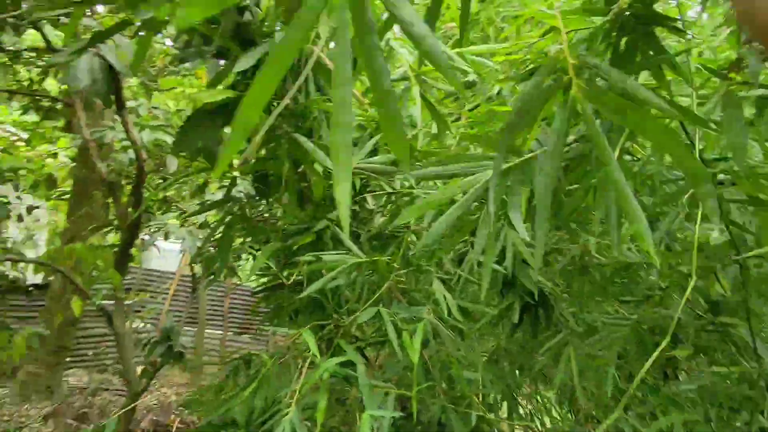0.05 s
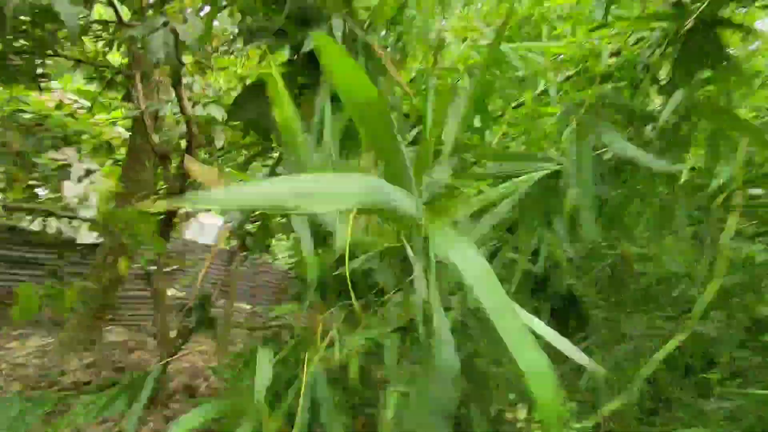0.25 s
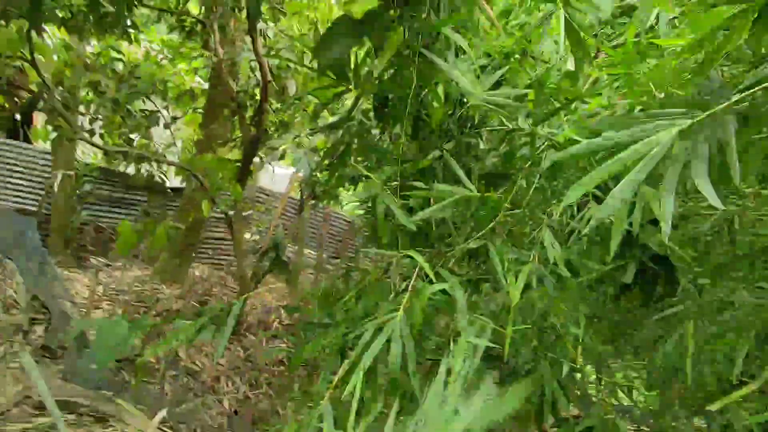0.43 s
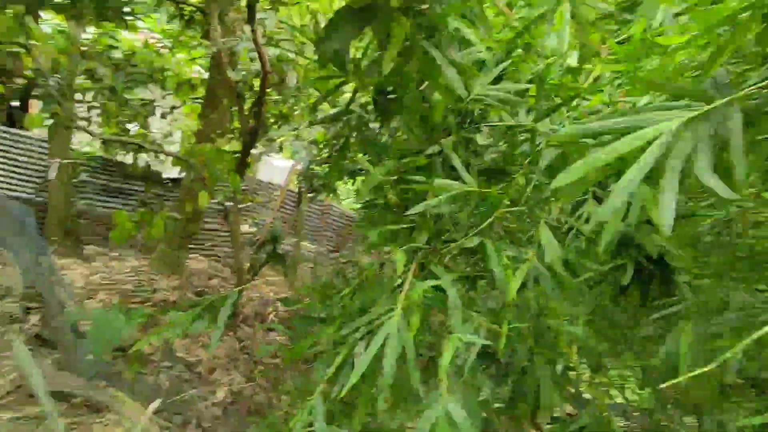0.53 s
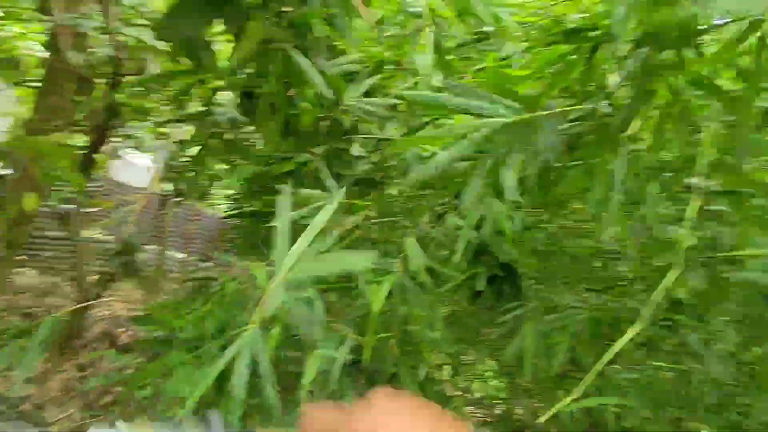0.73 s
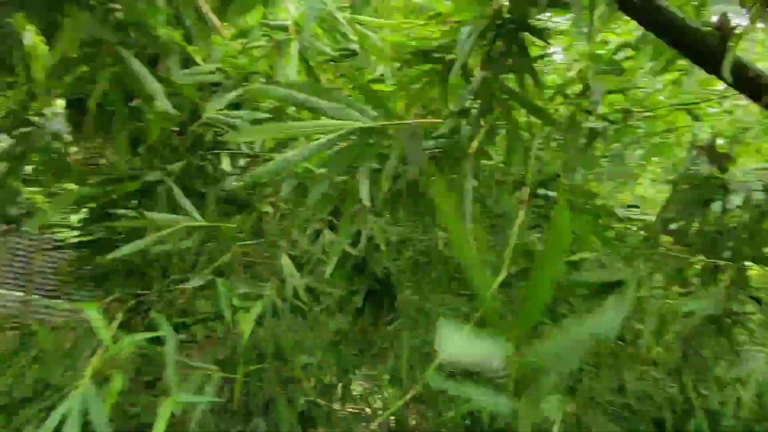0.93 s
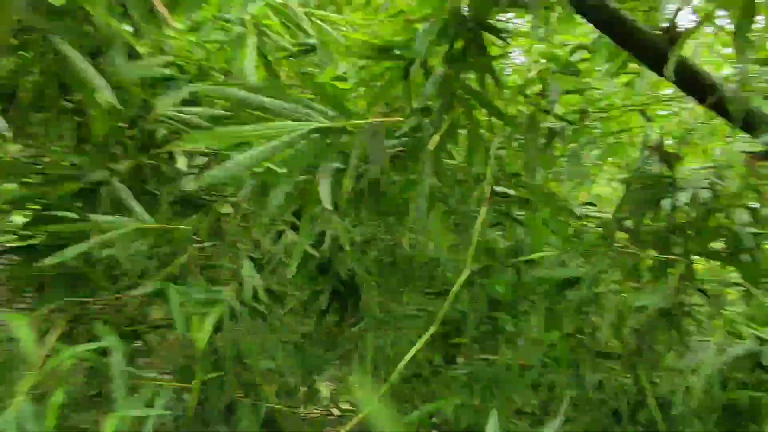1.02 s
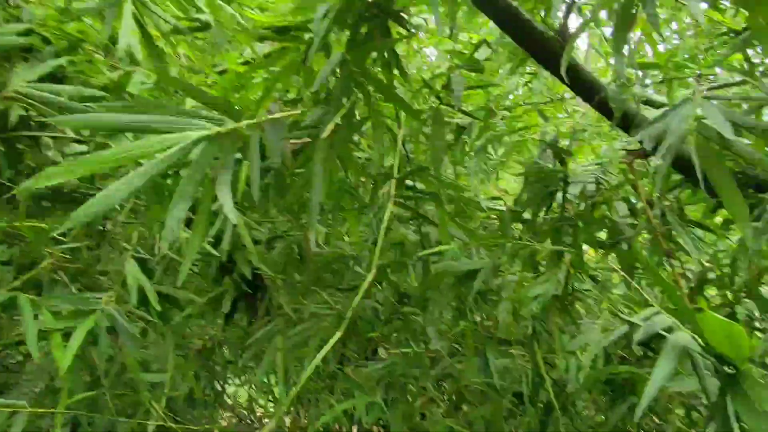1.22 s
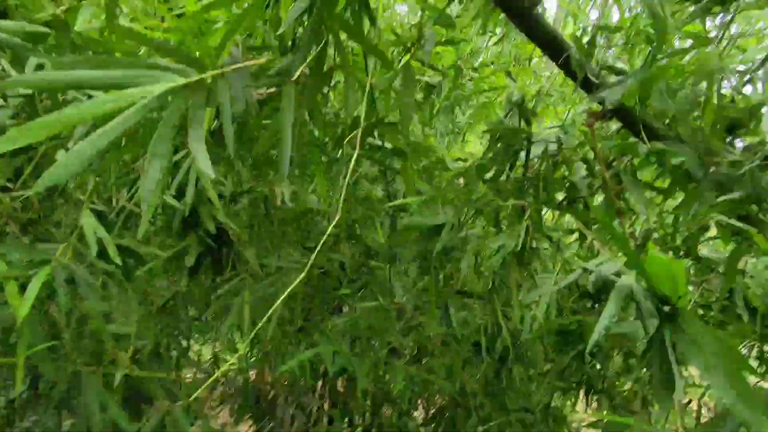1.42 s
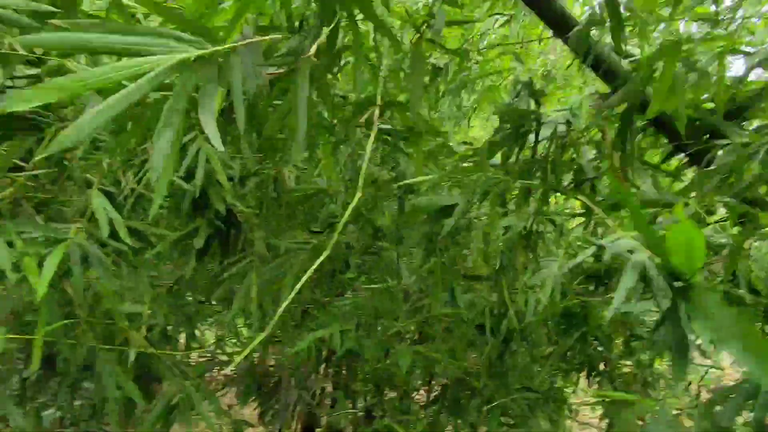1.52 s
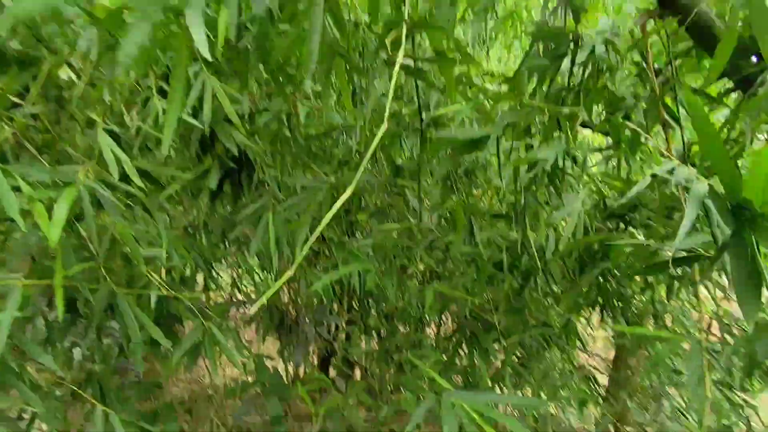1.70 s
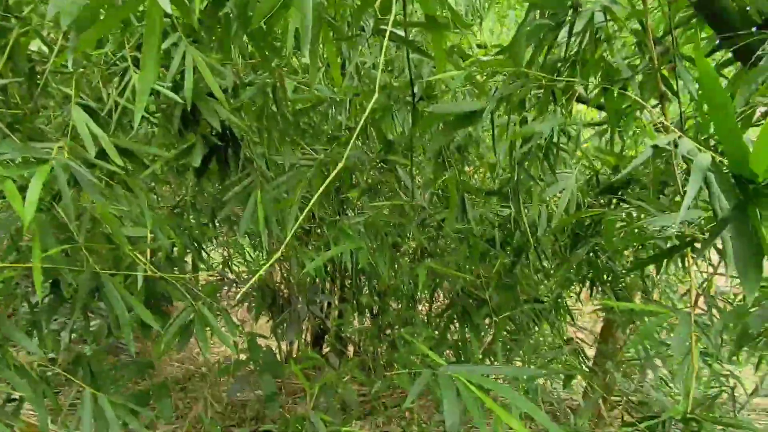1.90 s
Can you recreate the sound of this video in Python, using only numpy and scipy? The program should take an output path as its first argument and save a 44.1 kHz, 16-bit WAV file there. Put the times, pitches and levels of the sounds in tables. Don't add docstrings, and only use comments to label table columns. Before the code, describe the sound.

Two hard machete chops through dry rustling foliage, with stem knocks and a faint distant engine

```python
import sys
import numpy as np
from scipy import signal
from scipy.fft import rfft, irfft, next_fast_len
from scipy.io import wavfile
from scipy.ndimage import uniform_filter1d

SR = 44100
rng = np.random.default_rng(int(sys.argv[2]) if len(sys.argv) > 2 else 0)


def volts_from_db(level):
    exponent = np.asarray(level, float) / 20
    return 10 ** exponent


def transcribe(u):
    v = np.clip(np.atleast_2d(u).T, -1, 1)
    q = np.round(v * 32767).astype(np.int16)
    wavfile.write(sys.argv[1], SR, q)


N = 85995


def in_time(rows):
    s, *columns = np.transpose(rows)
    return [np.interp(np.arange(N) / SR, s, column) for column in columns]


def rms_one(x):
    return x / np.sqrt(np.mean(x ** 2) + 1e-20)


def band(x, low_hz, high_hz, order=2):
    edges_hz = [low_hz, min(high_hz, .45 * SR)]
    return signal.sosfilt(signal.butter(order, edges_hz, "band", fs=SR, output="sos"), x)


def colour(x, points):
    size = next_fast_len(N + 4096)
    hz, db = np.transpose(points)
    bins_hz = np.arange(1, size // 2 + 2) * SR / size
    gain_db = np.interp(np.log(bins_hz), np.log(hz), db)
    return irfft(rfft(x, size) * volts_from_db(gain_db), size)[:N]


def drift(rate_hz):
    pole = np.exp(-2 * np.pi * rate_hz / SR)
    noise = rng.standard_normal(N + SR)
    return rms_one(signal.lfilter([1], [1, -2 * pole, pole * pole], noise)[SR:])


# frequency_hz, gain_db
LEAF_HISS = [(4000, -30.5), (5000, -16), (5700, -8.5), (6000, -0.5), (6900, 1.5), (7500, -0.5)]
HISS_LOW_HZ = 6000


def leaf_grains(per_s, spread_db, spectrum, patchy_db):
    sizes_db = spread_db * np.minimum(rng.exponential(1, (2, N)), 5)
    sizes = volts_from_db(sizes_db) * rng.standard_normal((2, N))
    clicks = sizes * (rng.random((2, N)) < per_s / SR) + 1e-18
    clicks = clicks / np.sqrt(np.mean(clicks ** 2))
    hz, db = np.transpose(spectrum)
    edges = np.append(19.7 * 2 ** np.arange(0, 8.2, .5), HISS_LOW_HZ)
    body, shared = 0, drift(25)
    for k, (low, high) in enumerate(zip(edges, edges[1:])):
        level_db = np.interp(np.log(low * high) / 2, np.log(hz), db, left=db[0] + 6)
        swell_db = patchy_db * (shared + drift(36))
        body = body + volts_from_db(level_db + swell_db) * band(clicks[k % 2], low, high, order=5)
    hiss = colour(clicks[1, ::-1], [(2000, -60)] + LEAF_HISS)
    hiss = volts_from_db(db[-1] + patchy_db * (shared + drift(60))) * hiss
    scale = np.sqrt(np.mean(body ** 2))
    return body / scale, hiss / scale


def foliage(level_db, bright_db, grains, top_db):
    body, hiss = grains
    return volts_from_db(level_db) * (volts_from_db(-bright_db) * body + volts_from_db(top_db + bright_db) * hiss)


# frequency_hz, level_db
AIR_COLOUR = [(30, -10.5), (59, -4), (93, -4.5), (175, -11), (443, -15.5), (1000, -24), (3000, -31.5),
              (5500, -39)]


def distant_air():
    grains = leaf_grains(40000, .1, AIR_COLOUR, patchy_db=0.64)
    return foliage(-51.5, 0, grains, top_db=10.7)


# time_s, firing_hz, level_db, upper_orders_db
ENGINE_RUN = [(0, 30.57, -58, 5), (.45, 28.58, -51.5, -10.5), (.62, 29.98, -55.5, 3.5),
              (.75, 33.8, -60.5, -1), (1.0, 35.09, -55, 5.5), (1.15, 35.43, -60.5, 9.5),
              (1.27, 36.58, -50.5, -1), (1.45, 37.55, -56.5, 4), (1.68, 37.46, -52.5, -4.5),
              (1.8, 34.96, -57, -15), (1.95, 37.63, -48.5, -30)]
# multiple, level_db
ENGINE_ORDERS = [(2, 4.5), (3, -0.5), (4, 1), (5, -3.5), (6, -12), (9, -13.5)]


def engine():
    firing_hz, level_db, upper_db = in_time(ENGINE_RUN)
    phase = 2 * np.pi * np.cumsum(firing_hz * (1 + 0.016 * drift(6.2))) / SR
    drone = 0
    for multiple, order_db in ENGINE_ORDERS:
        wobble_db = 1.8 * drift(11.0)
        gain = volts_from_db(order_db + upper_db * (multiple > 3.5) + wobble_db)
        drone = drone + gain * np.sin(round(multiple) * phase + rng.uniform(0, 5.93))
    return volts_from_db(level_db) * drone


# time_s, level_db, brightness_db
SWAY = [(0, -58.5, 0.5), (.17, -73, -4), (.33, -38, 4.5), (.44, -43, 4.5), (.57, -44.5, 0.5),
        (.593, -40, 7.5), (.625, -46.5, -0.5), (.68, -48.5, 1), (.78, -52.5, 3.5), (.86, -47, 3),
        (.95, -48.5, 1), (1.1, -57, 1), (1.26, -55, 1), (1.45, -57, 1), (1.58, -45.5, -1),
        (1.7, -42.5, 2.5), (1.81, -50.5, 4), (1.95, -54.5, 0)]
# frequency_hz, level_db
RUSTLE_COLOUR = [(150, -64), (350, -4.5), (1150, 2), (2000, -3), (3000, -6.5), (4200, -8), (5500, -15.5)]


def swaying_foliage():
    level_db, bright_db = in_time(SWAY)
    grains = leaf_grains(9000, 1.8, RUSTLE_COLOUR, patchy_db=1.0)
    return foliage(level_db - 3.5, bright_db, grains, top_db=14.5)


def decaying_tones(events):
    out, age = np.zeros(N + SR), np.arange(SR // 4) / SR
    for start_s, peak_db, pitch_hz, t60_s in events:
        i = int(start_s * SR)
        rise = 1 - np.exp(-age * 30 / t60_s)
        decay = volts_from_db(peak_db - 60 * age / t60_s)
        out[i:i + len(age)] -= decay * rise * np.sin(2 * np.pi * pitch_hz * age)
    return out[:N]


# start_s, peak_db, pitch_hz, length_cycles
THUMPS = [(0.2188, -13.5, 900, 4.2), (0.2261, -16, 439, 1.9), (0.212, -23, 220.4, 17.7),
          (0.241, -27, 286, 12), (0.258, -19, 130, 1.1), (1.4876, -18, 397, 1.6), (1.549, -8, 282, 0.57),
          (1.5533, -11.5, 306, 1.22), (1.559, -15.5, 129.4, 1.55), (1.69, -41, 230, 7),
          (1.712, -39.5, 282, 5), (.42, -37, 237, 3.4)]


def stem_thumps():
    return decaying_tones([(s, db, hz, 2 * cycles / hz) for s, db, hz, cycles in THUMPS])


# start_s, peak_db, pitch_hz, t60_s
RINGS = [
    (.244, -16.5, 1330, 0.051),
    (.302, -30, 1580, 0.14),
    (.316, -41, 1770, 0.091),
    (.322, -29.5, 1616, 0.17),
    (.216, -23, 480, 0.082),
    (.218, -19, 2030, 0.031),
    (.606, -32, 1095, 0.039),
    (1.4695, -25, 4050, 0.011),
    (1.515, -24, 1238, 0.069),
]


def blade_and_cane_rings():
    steady, flutter_hz = .78, 260
    return decaying_tones(RINGS) * (steady + (1 - steady ** 2) ** .5 * drift(flutter_hz))


# start_s, peak_db
TICKS = [(.1706, -27.5), (.2187, -21), (.2513, -20.5), (.2565, -15), (.2795, -14), (.3865, -34),
         (.3905, -32), (.506, -32), (1.2378, -28), (1.4696, -23.5), (1.4705, -27), (1.4722, -21),
         (1.5057, -18), (1.519, -19), (1.5212, -21), (1.5752, -30), (1.6722, -27)]
# frequency_hz, gain_db
TICK_COLOUR = [(300, -19), (900, 2), (2500, 2), (5000, -7), (6000, 6.5), (7500, 13)]


def twig_ticks():
    start_s, peak_db = np.transpose(TICKS)
    clicks = np.zeros(N)
    clicks[(start_s * SR).astype(int)] = volts_from_db(peak_db + 6) * (-1) ** np.arange(1, len(start_s) + 1)
    return colour(clicks, TICK_COLOUR)


# start_s, peak_db, brightness_db, t60_s
CRACKS = [(0.17, -21, 3, .012), (0.2057, -23, -3, .02), (.2082, -28, 2, .014), (0.2144, -18, 2, .018),
          (0.218, -14, -4, .012), (0.2445, -11.5, -1, .018), (0.2516, -15, 2.5, .01),
          (0.2514, -15, -3, .016), (0.2565, -20, 3, .01), (0.2767, -15, -3.5, .014),
          (0.2997, -23, -9, .016), (0.324, -23, -5.5, 0.029), (0.3857, -29, -2, .016),
          (0.5504, -35, -1, .012), (0.587, -33, 6, .02), (0.6112, -31.5, -0.5, .02), (0.6638, -39, 9, .012),
          (0.6734, -29, 4, .014), (0.6975, -34, -2, .012), (0.8446, -42, 9, .012), (1.152, -48, -19, 0.046),
          (1.2354, -51, 5, 0.01), (1.39, -40.5, -1.5, 0.09), (1.4697, -8, 4, .008), (1.4714, -22, 6, .014),
          (1.473, -27, -3, .008), (1.4895, -30, -0.5, .008), (1.5058, -13, -1, 0.012),
          (1.507, -23, 10, .012), (1.5113, -26, 10.5, .014), (1.516, -29, 10, .012),
          (1.5174, -12.5, 12.5, .012), (1.5194, -13, 0.5, .008), (1.52, -21, -6, 0.0017),
          (1.5265, -16, 5, .014), (1.5312, -21, 0, .012), (1.5462, -26, 6, .016),
          (1.5495, -22.5, 10.5, .014), (1.5603, -17, -1, .012), (1.565, -30, 10.5, .014),
          (1.57, -28, 4, .016), (1.5743, -25.5, -6, .01), (1.6719, -23.5, 2, .02), (1.715, -27.5, 8, 0.02),
          (1.755, -28.5, 16, 0.016), (1.814, -39, 12, .014)]


def cracks():
    out, t = np.zeros(N), np.arange(N) / SR
    body, hiss = leaf_grains(30000, .1, TORN_COLOUR[2:], patchy_db=.1)
    for start_s, peak_db, bright_db, t60_s in CRACKS:
        i = int(start_s * SR)
        age = t[:min(N - i, 6000)]
        here = slice(i, i + len(age))
        decay_db = -60 * age / max(t60_s, .004)
        rise = np.minimum(age / 0.00054, 1)
        snap = rise * foliage(decay_db, bright_db, (body[here], hiss[here]), top_db=12)
        out[here] += volts_from_db(peak_db + 5.5) * snap / np.abs(snap).max()
    return out


# time_s, level_db, brightness_db
STROKES = [
    [(.176, -56, -1), (.182, -41.5, -2), (.203, -38, 0), (.208, -24, 0.5), (.238, -26, -1.5),
     (.251, -20.5, 0.5), (.27, -26.5, -1.5), (.335, -34.5, -1), (.352, -41.5, -5)],
    [(1.459, -89, -8), (1.463, -41.5, 1.5), (1.488, -36, -2.5), (1.503, -32, -4), (1.517, -25.5, 5),
     (1.526, -31, -3.5), (1.55, -28.5, 0.5), (1.572, -38, -1), (1.59, -38.5, -1.5)],
]
# frequency_hz, level_db
TORN_COLOUR = [(60, -9.5), (120, -5), (300, -5), (1200, -9), (2000, -9.5), (3000, -11.5), (4200, -16.5),
               (5500, -16.5)]


def tearing_strokes():
    level_db, bright_db, t = np.full(N, -120.), np.zeros(N), np.arange(N) / SR
    for rows in STROKES:
        first_s, last_s = rows[0][0], rows[-1][0]
        on = (t >= first_s) & (t < last_s + .3)
        stroke_db, stroke_bright_db = in_time(rows)
        release_db = 150 * np.maximum(t - last_s, 0)
        level_db[on] = (stroke_db - release_db)[on]
        bright_db[on] = stroke_bright_db[on]
    grains = leaf_grains(14000, 1.2, TORN_COLOUR, patchy_db=.6)
    tearing = foliage(level_db - 4, bright_db, grains, top_db=14)
    stalks = signal.sosfilt(signal.butter(2, 900, fs=SR, output="sos"), tearing)
    stalk_gain = volts_from_db(.16 * np.minimum(level_db + 35.5, 0))
    return tearing + (stalk_gain - 1) * stalks


def scene():
    thicket = swaying_foliage() + distant_air()
    blade = tearing_strokes() + cracks() + twig_ticks()
    struck = stem_thumps() + blade_and_cane_rings()
    return np.tile(thicket + blade + struck + engine(), (2, 1))


# frequency_hz, gain_db
CAPSULE_COLOUR = [(2300, -0.5), (2900, -1), (3480, 1), (3620, -2.5), (4200, -1.5), (4800, -0.5)]


def capsule(x):
    low_cut = signal.butter(4, 46.5, "high", fs=SR, output="sos")
    return signal.sosfilt(low_cut, colour(x, CAPSULE_COLOUR))


# start_s, end_s, low_hz, high_hz
SPLIT = [(.02, .05, 6200, 7600), (.1, .15, 6200, 7600), (.28, .33, 6200, 7600), (.34, .39, 5000, 7600),
         (.44, .48, 6200, 7600), (.51, .58, 6200, 7600), (.62, .67, 5200, 7600), (.78, .82, 6200, 7600),
         (.87, .94, 6200, 7600), (.98, 1.04, 6200, 7600), (1.11, 1.18, 6200, 7600),
         (1.23, 1.26, 5200, 7600), (1.3, 1.33, 6200, 7600), (1.468, 1.51, 4300, 7600),
         (1.53, 1.67, 6100, 7600), (1.72, 1.76, 5600, 6900), (1.83, 1.88, 5400, 6900),
         (.24, .3, 4200, 5200), (.48, .55, 4600, 5700), (.81, .84, 4200, 5100), (1.27, 1.37, 4200, 5100),
         (1.54, 1.6, 4600, 5700), (1.65, 1.71, 4600, 5700)]


def treble_split(mid):
    side, t, white = 0, np.arange(N) / SR, rng.standard_normal(N)
    for start_s, end_s, low_hz, high_hz in SPLIT:
        inside_s = np.minimum(t - start_s, end_s - t)
        gate = np.sin(np.pi / 2 * np.clip(inside_s / .02 + .5, 0, 1)) ** 2
        power = uniform_filter1d(band(mid, low_hz, high_hz, order=4) ** 2, size=400)
        noise = rms_one(band(white, low_hz, high_hz, order=10))
        side = side + volts_from_db(-6.5) * gate * np.sqrt(np.abs(power)) * noise
    return side


# start_s, end_s
LEAKS = [
    (.172, 0.18),
    (1.23, 1.244),
    (1.462, 1.482),
]


def onset_spill(mid):
    t, gate = np.arange(N) / SR, 0
    for start_s, end_s in LEAKS:
        gate = gate + np.clip(np.minimum(t - start_s, end_s - t) / .004, 0, 1)
    return volts_from_db(-14.5) * band(gate * mid, 7500, 7950, order=2) * np.array([[.9], [1.1]])


def roll_off(x):
    return signal.sosfilt(signal.butter(12, 8600, fs=SR, output="sos"), x)


def record(dry):
    mid = capsule(dry[0])
    side = treble_split(mid)
    top_cut = signal.ellip(16, .5, 60, 7550, fs=SR, output="sos")
    stereo = signal.sosfilt(top_cut, np.array([mid + side, mid - side]))
    return roll_off(stereo + onset_spill(mid))


dry = scene()
out = record(dry)
transcribe(out)
```